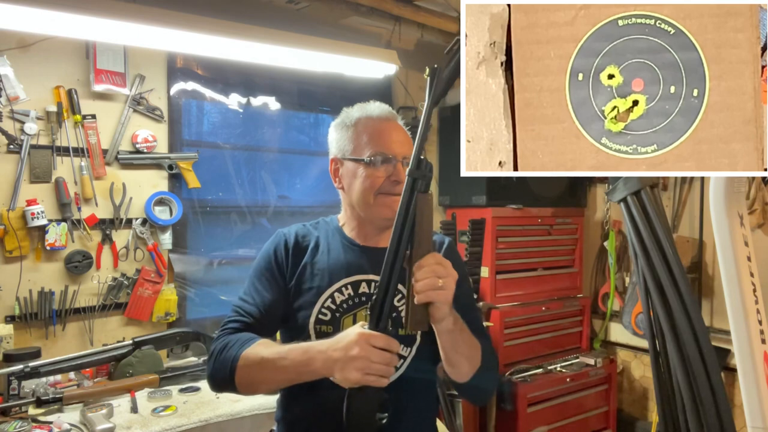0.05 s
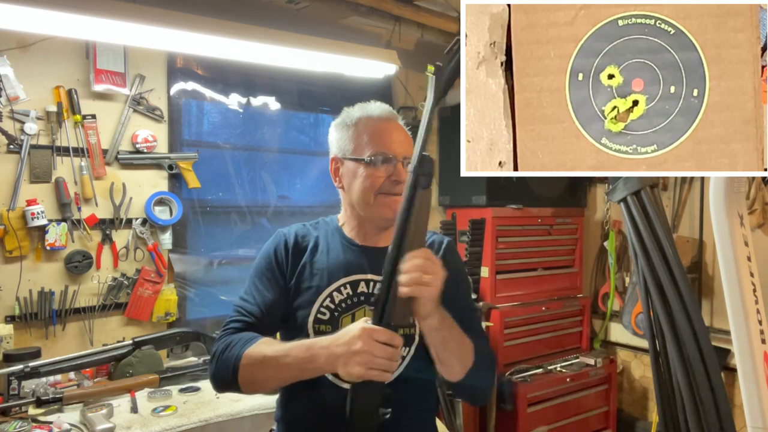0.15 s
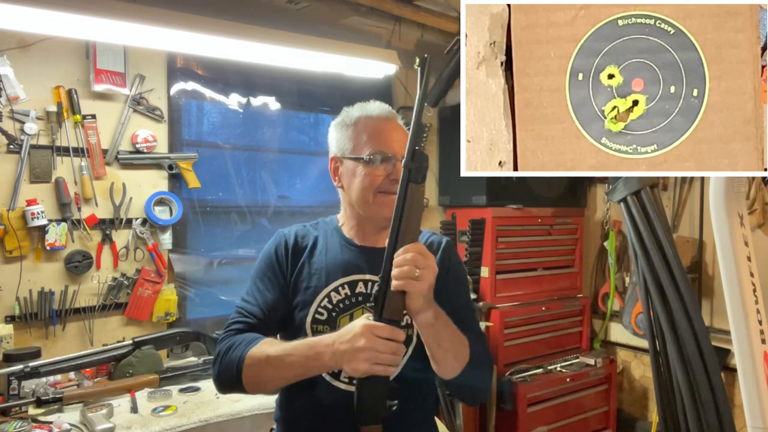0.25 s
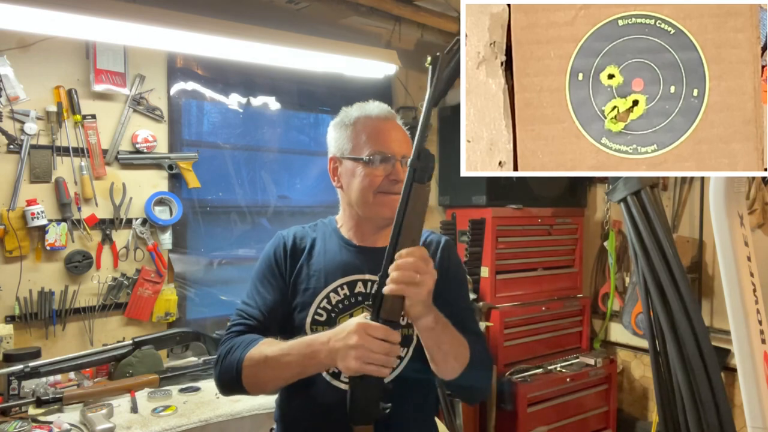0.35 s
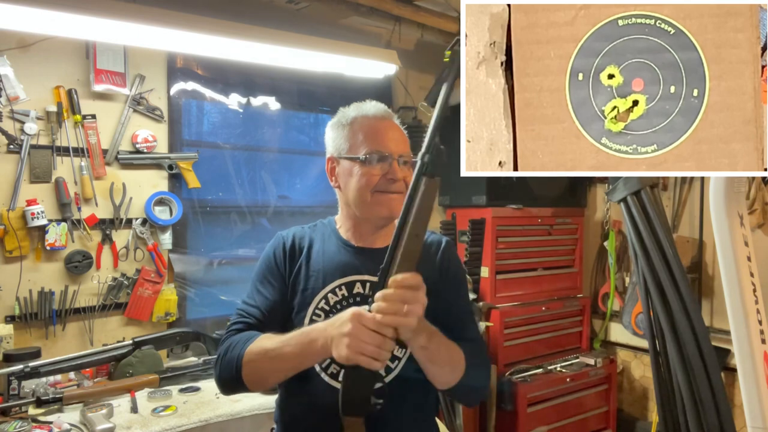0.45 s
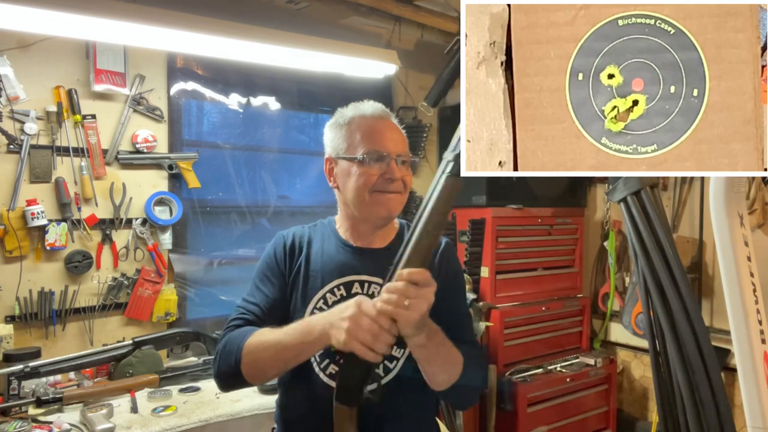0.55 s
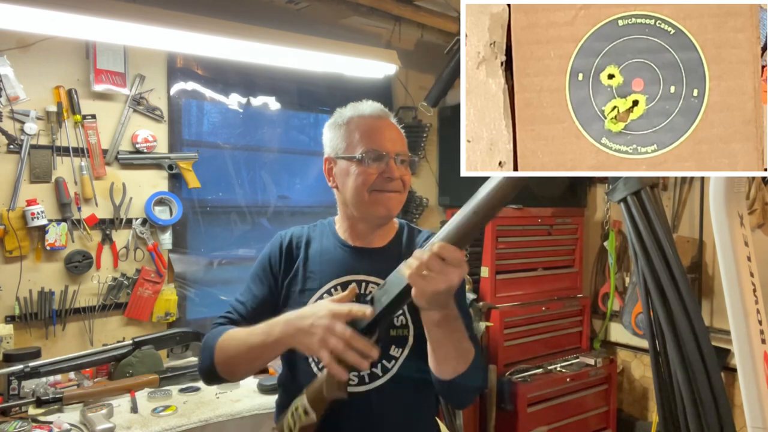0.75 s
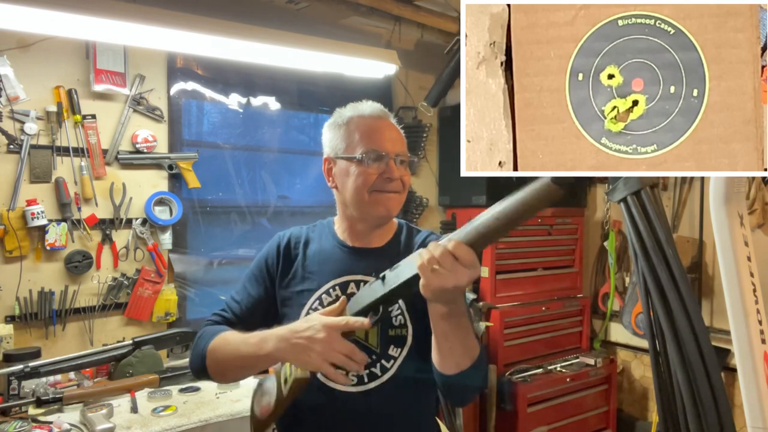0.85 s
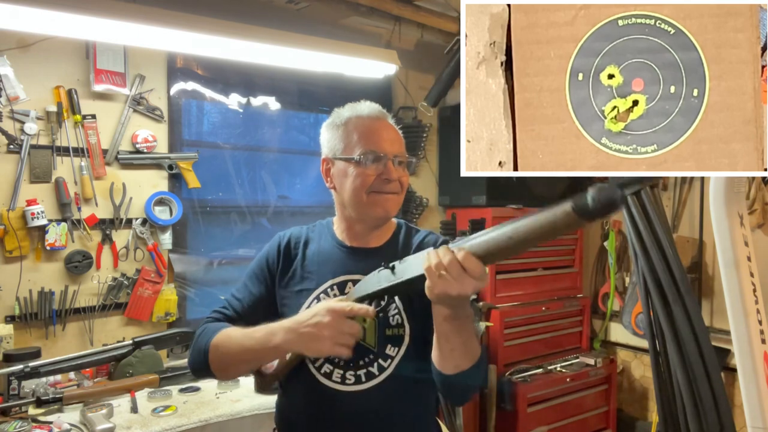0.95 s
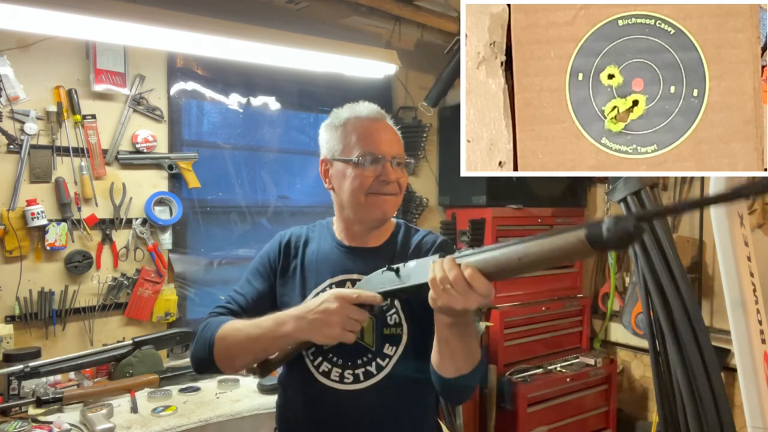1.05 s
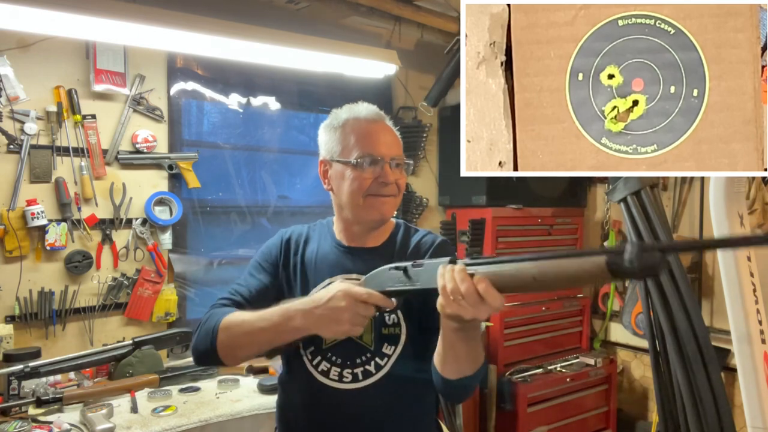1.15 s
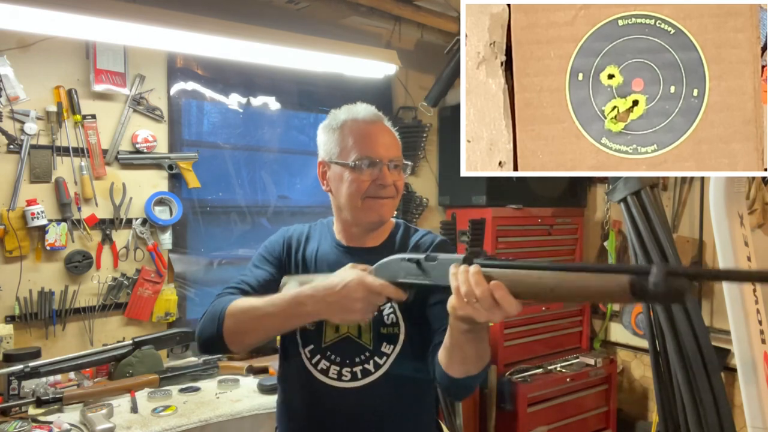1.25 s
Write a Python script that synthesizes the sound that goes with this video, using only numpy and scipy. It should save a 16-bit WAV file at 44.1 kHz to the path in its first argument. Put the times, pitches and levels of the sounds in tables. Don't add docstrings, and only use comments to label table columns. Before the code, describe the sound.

Loud metallic clack of an air rifle pump lever closing in a garage, then a click and soft handling

```python
import sys
import numpy as np
from scipy import signal
from scipy.io import wavfile

SR = 44100
rng = np.random.default_rng(int(sys.argv[2]) if len(sys.argv) > 2 else 0)


def put_to_file(sound):
    columns = np.atleast_2d(sound).T
    safe = np.clip(columns, -1, 1)
    whole_steps = np.round(safe * 32767)
    wavfile.write(sys.argv[1], SR, whole_steps.astype(np.int16))


def undo_db(level):
    steps = np.asarray(level, float) / 20
    return 10 ** steps


N = 57330


def at_hz(points, hz, col=1):
    p = np.array(points)
    return np.interp(np.log(hz), np.log(p[:, 0]), p[:, col])


def rms_one(x):
    return x / np.sqrt(np.mean(x ** 2) + 1e-20)


def drift(rate_hz):
    r = np.exp(-2 * np.pi * rate_hz / SR)
    wander = signal.lfilter([1], [1, -2 * r, r * r], rng.standard_normal(N + SR))
    return rms_one(wander[SR:])


def ring(x, hz, t60):
    r = undo_db(-60 / (t60 * SR))
    w = 2 * np.pi * hz / SR
    return signal.lfilter([0, np.sin(w)], [1, -2 * r * np.cos(w), r * r], x + 1e-18)


def bands():
    edges = 18 * 2 ** np.arange(0, 10, 1 / 3)
    white = rng.standard_normal((2, N + SR))
    out = []
    for k, (low, high) in enumerate(zip(edges, edges[1:])):
        sos = signal.butter(2, [low, high], "band", fs=SR, output="sos")
        out.append((np.sqrt(low * high), signal.sosfilt(sos, white[k % 2])[SR:]))
    return out


def coloured(spectrum, patchy_db, rate_hz):
    shared = drift(rate_hz)
    total = np.zeros(N)
    for hz, noise in bands():
        flicker = 0.4 * shared + drift(rate_hz)
        total += undo_db(at_hz(spectrum, hz) + patchy_db * flicker) * noise
    return rms_one(total)


def body(contacts, modes, spread_db):
    punch_db, crack_s, detune, room_damping = 14, 0.0011, .03, .3
    direct, send = np.zeros((2, 2 * N))
    n = np.arange(8192)
    for s, db, hard_hz, crack_db, room_db in contacts:
        luck = rng.standard_normal((len(modes), 2))
        grit = rng.standard_normal(len(n))
        r = np.exp(-2 * np.pi * hard_hz / SR)
        click = (1 - r) ** 2 * (1 + n) * r ** n
        crack = undo_db(crack_db) * signal.lfilter([1 - r, r - 1], [1, -r], grit) * np.exp(-n / SR / crack_s)
        punch = undo_db(punch_db) * (1 - r) * (r * r) ** n

        def struck(damping):
            total = np.zeros(len(n))
            for k, ((hz, mode_db, t60), (u, v)) in enumerate(zip(modes, luck)):
                tuned_hz = hz * (1 + detune * spread_db / 3 * v)
                total += undo_db(mode_db + spread_db * u) * (-1) ** k * ring(click, tuned_hz, t60 * damping)
            return total

        span = slice(int(s * SR), int(s * SR) + len(n))
        direct[span] += undo_db(db) * (struck(1) + crack)
        send[span] += undo_db(db + room_db) * (struck(room_damping) + punch)
    return np.array([direct[:N], send[:N]])


# (frequency [Hz], density [dB per Hz])
HUM_COLOUR = [(14, -4), (40, -11.5), (150, -20), (300, -29), (520, -24), (1000, -28), (3000, -43),
              (14500, -53.5)]


def room_tone():
    hum = undo_db(-52) * coloured(HUM_COLOUR, .7, 6)
    return hum + undo_db(-50) * drift(8)


# (frequency [Hz], decay t60 [s], level [dB])
GARAGE_DECAY = [(276, 0.13, -24), (450, 0.33, -7.5), (1000, 0.23, -0.5), (1700, 0.27, -1.5),
                (2870, 0.23, 2), (5000, 0.28, -2.5), (9000, 0.2, -5.5), (14000, 0.13, -8.5)]


def garage(x):
    gap_s, late_db, late_stretch = 0.0017, -30.5, 3.2
    t = np.arange(N) / SR
    tail = np.zeros(N)
    for hz, noise in bands():
        if hz > 260:
            t60 = at_hz(GARAGE_DECAY, hz)
            decay = undo_db(-60 * t / t60) + undo_db(late_db - 60 * t / t60 / late_stretch)
            tail += undo_db(at_hz(GARAGE_DECAY, hz, col=2)) * noise * decay
    build_up = 1 - np.exp(-(t / gap_s) ** 2)
    tail = tail * build_up / np.sqrt(np.sum(tail ** 2)) * undo_db(0.5)
    return signal.fftconvolve(x, tail)[:N]


# (time [s], level [dB])
HAND_MOVES = [(0, -70.5), (0.401, -71), (.48, -64), (.52, -73), (.545, -61.5), (.6, -55.5), (.665, -59.5),
              (.7, -76.5), (.885, -77.5), (0.912, -61), (.97, -65), (1.005, -64.5), (1.055, -61.5),
              (1.11, -65), (1.15, -68.5), (1.19, -60), (1.235, -63), (1.3, -65)]
# (frequency [Hz], density [dB per Hz])
RUSTLE_COLOUR = [(800, -29.5), (1500, -7), (3000, 4.5), (7000, 2), (10000, -6.5), (13500, -3.5),
                 (15000, -20)]


def rustle():
    s, db = np.transpose(HAND_MOVES)
    movement = undo_db(0.5 + np.interp(np.arange(N) / SR, s, db))
    return movement * coloured(RUSTLE_COLOUR, .9, 17)


# (time [s], level [dB], pitch [Hz], decay t60 [s])
TINY_TICKS = [
    (.088, -50, 2800, .005),
    (.483, -49, 6500, .004),
    (.5633, -40, 3400, .003),
    (.905, -54, 7000, .003),
    (1.043, -51, 3100, .015),
    (1.061, -49, 8500, .005),
    (1.217, -53, 3700, .012),
]


def ticks():
    out = np.zeros(N)
    for s, db, hz, t60 in TINY_TICKS:
        click = 1. * (np.arange(N) == int(s * SR))
        out += undo_db(db) * ring(click, hz, t60)
    return out


# (time [s], level [dB], hardness [Hz], crack [dB], room [dB])
STOCK_HITS = [
    (1.2800, -33.5, 6040, -11.5, -34),
    (1.2815, -55.5, 4000, -18, -20),
    (1.2828, -38, 2530, -20, 4),
]
# (frequency [Hz], level [dB], decay t60 [s])
STOCK_MODES = [(433.3, -4, 0.074), (740, -11, .06), (1104, -4.5, 0.023), (1328, -4.5, 0.025),
               (1657, -4.5, 0.05), (2410, -5.5, 0.014), (2940, -3, .012), (3960, -6, 0.025),
               (4460, -3.5, 0.013)]


def stock_knock():
    return body(STOCK_HITS, STOCK_MODES, 2.3)


# (time [s], level [dB], hardness [Hz], crack [dB], room [dB])
LATCH_HITS = [
    (.5742, -9, 14000, -1, -20.5),
    (.5750, -33, 9000, -21.5, -1),
    (.5758, -23, 7000, -25.5, -17),
    (.5776, -12, 4020, -33, -8.5),
]
# (frequency [Hz], level [dB], decay t60 [s])
LATCH_RING = [(430, -17, .015), (865, -26, .18), (1180, -27, .14), (930, -7, .016), (1250, -3, .015),
              (1560, -8, .014), (2300, -7, .011), (3220, -10, .01), (4300, -10, .007), (6600, -9, .006)]


def latch_click():
    return body(LATCH_HITS, LATCH_RING, 1.0)


# (time [s], level [dB], hardness [Hz], crack [dB], room [dB])
TOUCH_HITS = [
    (.1952, -9, 4000, -11, -22),
    (.1968, -13, 4000, -18, -22),
    (.1984, -21, 4000, -28, -22),
    (.5402, -38, 3500, -20, -16),
    (.5422, -30, 2000, -30, -16),
    (.5440, -36, 2000, -30, -16),
    (.6855, -34, 1600, -30, -16),
]
# (frequency [Hz], level [dB], decay t60 [s])
TOUCH_RING = [(480, -12, .012), (1050, 0, .012), (1600, -8, .008), (2374, -7, .01), (3000, -9, .01),
              (4400, -17, .01), (7300, -22, .02)]


def light_touches():
    return body(TOUCH_HITS, TOUCH_RING, 0.83)


# (start [s], end [s], click rate [1/s], level [dB], rise [dB])
LINKAGE = (.2029, .2070, 14000, -16, 9)


def rattle():
    start, end, rate, db, rise_db = LINKAGE
    t = np.arange(N) / SR
    clicks = rng.standard_normal(N) * (rng.random(N) < rate / SR)
    clicks = clicks * (t > start) * (t < end)
    clicks = clicks * undo_db(db + rise_db * np.clip((t - end) / (end - start), -1, 0))
    modes = [(4200, 4, .004), (7400, 1.5, .004), (9500, 0, .003), (12500, -8.5, .002)]  # Hz, dB, t60 s
    return sum(undo_db(mode_db) * ring(clicks, hz, t60) for hz, mode_db, t60 in modes)


# (time [s], depth [dB], rise [s])
DIPS = [
    (0.2089, -1.5, .003),
    (0.2235, -8.5, 0.0029),
]


def sag():
    recovery_s, recovery_db = 0.3, -29
    out = np.zeros(N)
    for s, db, rise in DIPS:
        u = np.maximum(np.arange(N) / SR - s, 0)
        dip = (u / rise) ** 2 * np.exp(2 - 2 * u / rise)
        swing_back = undo_db(recovery_db) * (1 - np.exp(-u / .02)) * np.exp(-u / recovery_s)
        out -= undo_db(db) * (dip - swing_back)
    return out


# (time [s], level [dB], hardness [Hz], crack [dB], room [dB])
LEVER_HITS = [
    (.2066, 10.5, 10000, 1.5, -4),
    (.2085, 5.5, 5900, -4, -16.5),
    (.2112, 4.5, 6200, -4, -13.5),
    (.2145, -3.5, 4200, 1.5, -12.5),
    (.2215, -11.5, 5000, -7.5, -6),
    (.2265, -6, 4000, -4.5, -7),
    (.2375, -11, 6000, -6.5, -5.5),
]
# (frequency [Hz], level [dB], decay t60 [s])
LEVER_RING = [(470, -33, .25), (718, -28, .25), (430, -9, .014), (1000, -3, .014), (1420, -3, .012),
              (2030, -5, .01), (2410, -5, .012), (3150, -9, .01), (3850, -5, .012), (4700, -7, .008),
              (6200, -9, .006), (8900, -12, .005), (12500, -12, .004)]


def lever_slam():
    return body(LEVER_HITS, LEVER_RING, 2.0)


def scene():
    direct, send = stock_knock() + latch_click() + light_touches() + lever_slam()
    small = rattle() + ticks()
    reflections = garage(send + undo_db(-14) * small)
    mix = room_tone() + reflections + rustle() + small + sag() + direct
    return mix[None]


def band_limit(x):
    return signal.sosfilt(signal.butter(12, 15450, fs=SR, output="sos"), x)


def record(dry):
    clip_top, clip_hard = .99, 12.0
    x = signal.sosfilt(signal.cheby2(10, 30, 14800, fs=SR, output="sos"), dry)
    mix = x / (1 + np.abs(x / clip_top) ** clip_hard) ** (1 / clip_hard)
    return band_limit(mix)


dry = scene()
out = record(dry)
put_to_file(out)
```